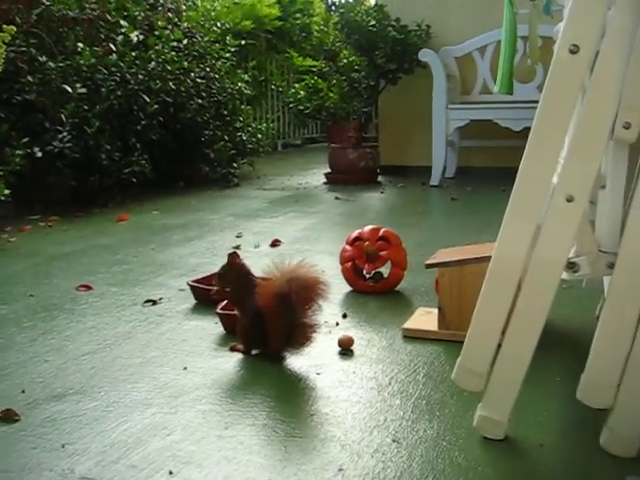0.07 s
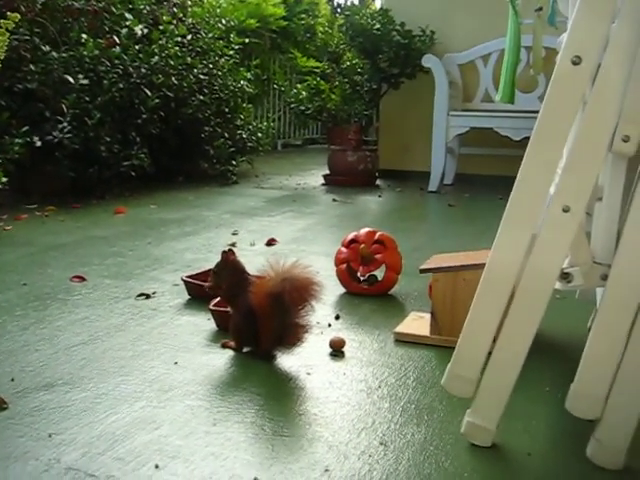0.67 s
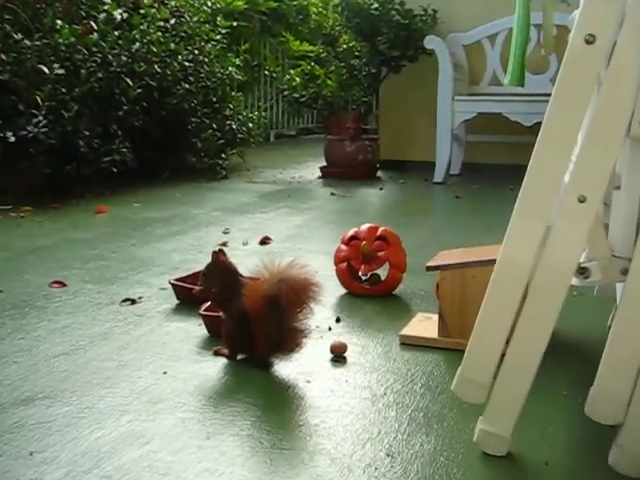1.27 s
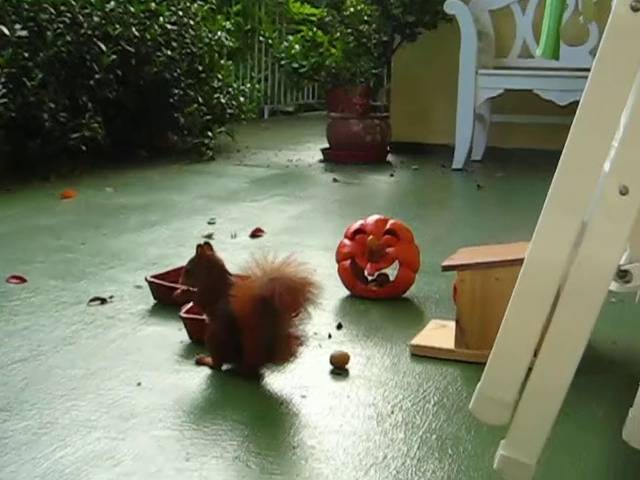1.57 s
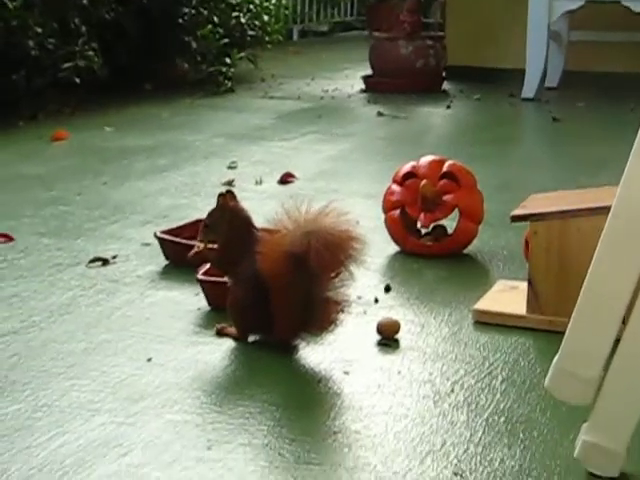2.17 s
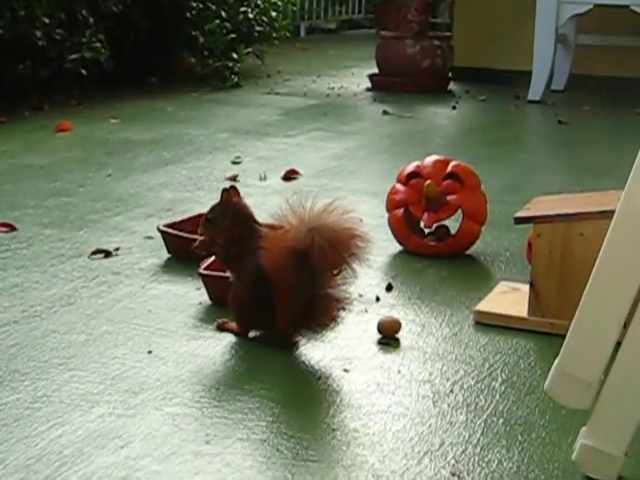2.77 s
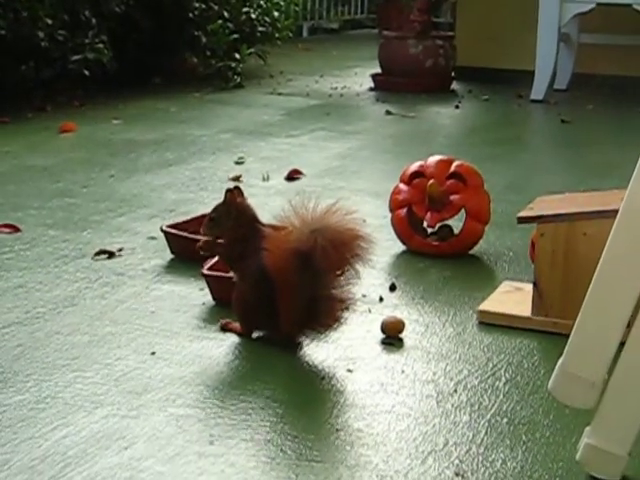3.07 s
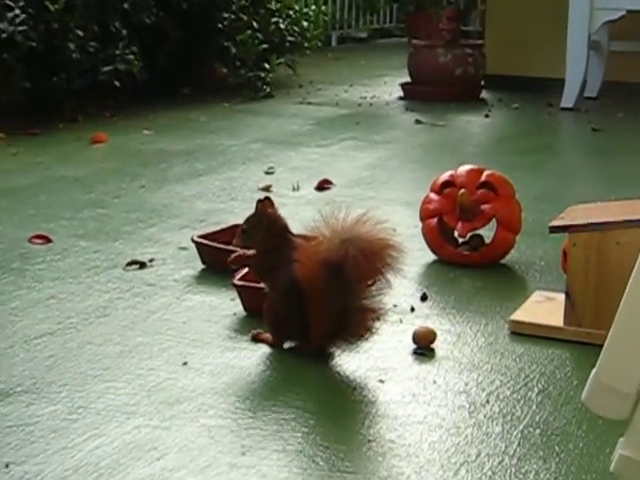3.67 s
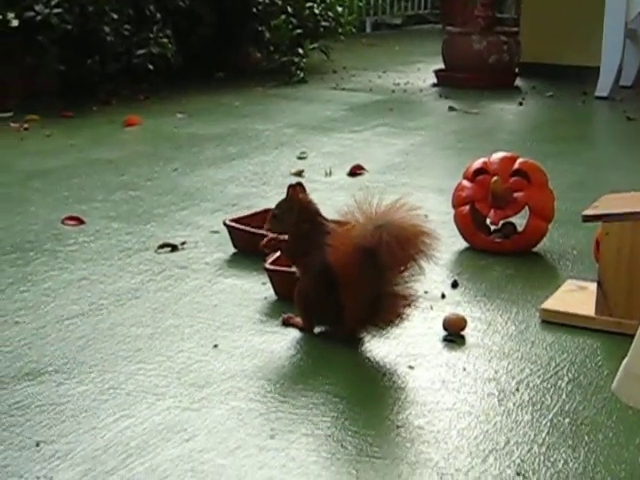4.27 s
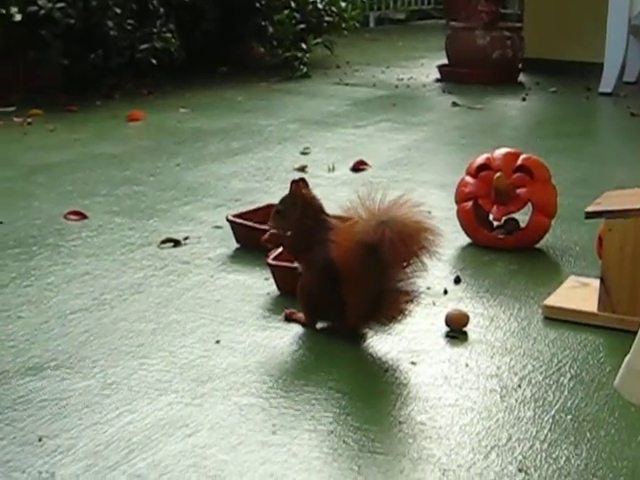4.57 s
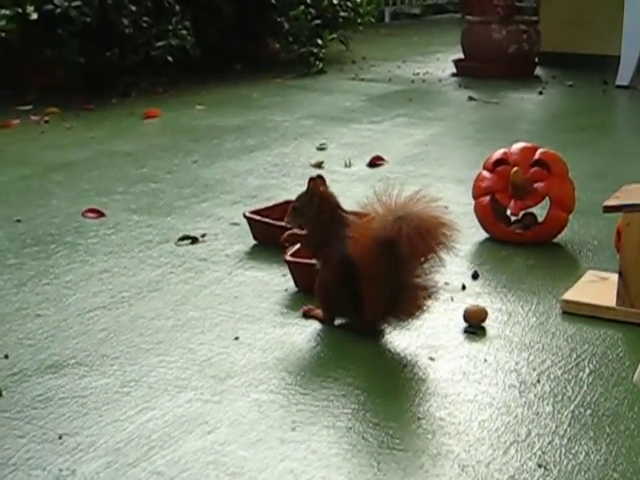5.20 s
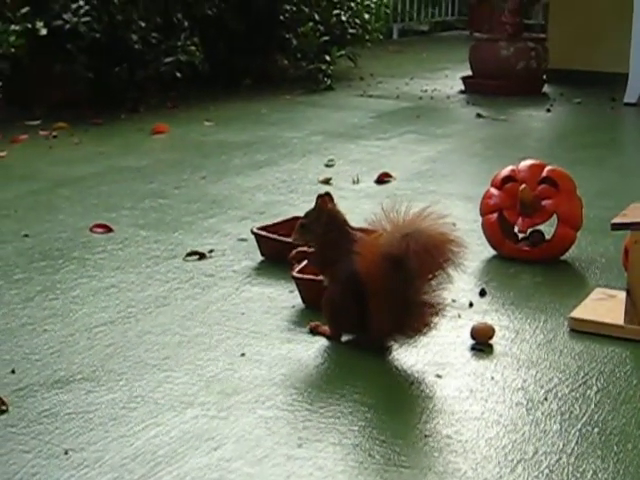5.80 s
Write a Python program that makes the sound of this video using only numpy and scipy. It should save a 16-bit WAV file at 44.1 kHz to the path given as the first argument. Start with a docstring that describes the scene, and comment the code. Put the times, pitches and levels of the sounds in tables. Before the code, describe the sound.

On a quiet covered terrace, faint outdoor air lies under the steady hiss and thin, high whine of a hand-held camera's mono microphone. The zoom motor whirs softly, briefly at first and then for about a second, among light taps and rustles. The zoom lever rattles and snaps back with a sharp plastic click. A few small ticks, rustles and a soft dull knock follow, then one last faint rustle.

```python
"""A quiet covered terrace, heard through the mono microphone of a hand-held camera.
From the start, faint outdoor air lies under preamplifier hiss and a thin electronic whine.
The zoom motor whirs briefly, then again at 1 s, among light taps on its lever and soft rustles.
At about 1.6 s the loose lever rattles and snaps back, ringing the plastic case.
A few small ticks, rustles and a dull knock follow after 3 s, and one last rustle near the end."""
import sys
import numpy as np
from scipy import signal
from scipy.fft import rfft, irfft
from scipy.io import wavfile

SR = 44100
rng = np.random.default_rng(int(sys.argv[2]) if len(sys.argv) > 2 else 0)


def put_to_file(sound):
    """Save the sound as 16-bit audio at rate SR, in the file named by the first command-line argument."""
    columns = np.atleast_2d(sound).T  # one column per channel
    safe = np.clip(columns, -1, 1)
    whole_steps = np.round(safe * 32767)
    wavfile.write(sys.argv[1], SR, whole_steps.astype(np.int16))


N = 257544
T = np.arange(N) / SR


def gain(db):
    """Turns decibels into a number to multiply by."""
    return 10 ** (np.asarray(db) / 20)


def normalise(sound):
    """Scales a sound so that its average level (rms) is 1."""
    return sound / np.sqrt(np.mean(sound ** 2) + 1e-20)


def colour(noise, spectrum):
    """Shapes noise along a curve of (Hz, dB) points, then brings its average level to 1."""
    hz, db = np.transpose(spectrum)
    bins_hz = np.fft.rfftfreq(N, 1 / SR)
    curve_db = np.interp(np.log(bins_hz + 1), np.log(hz), db, right=-60)
    return normalise(irfft(rfft(noise) * gain(curve_db), N))


# The tone of the steady air and hiss. Each row: frequency in Hz, relative level in dB.
AIR_SPECTRUM = [(20, -11), (45, -8), (95, -3.5), (150, -2), (300, -2), (560, -0.6), (1050, -1.1),
                (1400, -3.5), (2400, -7), (4000, -8), (4900, -10), (6100, -10), (7000, -12.5), (9100, -38)]
# The highest part of the preamplifier's hiss. Each row: frequency in Hz, relative level in dB.
FIZZ_SPECTRUM = [(6500, -47), (7200, 0), (8300, -0.4), (11200, -0.5), (12400, -6), (14300, -.3), (15200, 0),
                 (15700, -9), (16100, -30)]


def hiss(air_db=-53, fizz_db=-61):
    """Distant outdoor air blends with the even noise of the microphone's preamplifier."""
    air, fizz = rng.standard_normal((2, N))
    return gain(air_db) * colour(air, AIR_SPECTRUM) + gain(fizz_db) * colour(fizz, FIZZ_SPECTRUM)


# The tones of the camera's electronic clocks. Each row: pitch in Hz, average level in dB.
CLOCK_TONES = [(7568.6, -67.5), (7867, -79), (11518, -83.5), (15137.2, -67.2)]


def whine(frames_per_s=30):
    """The clocks leak thin tones that restart with every picture frame, which adds a faint buzz."""
    frame_time = T % (1 / frames_per_s)
    return np.sqrt(2) * sum(gain(db) * np.sin(2 * np.pi * hz * frame_time) for hz, db in CLOCK_TONES)


# The tone of the zoom motor. Each row: frequency in Hz, relative level in dB.
MOTOR_SPECTRUM = [(500, -0.5), (1500, -3.5), (3600, -7), (5000, -9), (6400, -6), (8500, -16), (12000, -13),
                  (13700, -9), (15500, -12), (16200, -30)]
# The runs of the motor. Each row: start in seconds, seconds until it runs down, average level in dB.
MOTOR_RUNS = [(-.04, .15, -60), (.98, 0.89, -59.5)]


def zoom_motor(spurts_per_s=33, depth=0.65, spin_up_s=0.053, fade_db_per_s=31):
    """The lens motor spins up, whirs in quick small spurts and runs down."""
    spurts = 1 + depth * np.sin(2 * np.pi * (spurts_per_s * T + rng.random()))
    whir = colour(spurts * rng.standard_normal(N), MOTOR_SPECTRUM)
    level = np.zeros(N)
    for start, run_s, db in MOTOR_RUNS:
        age = T - start
        spin_up = np.clip(age / spin_up_s, 0, 1)
        level += spin_up * gain(db - fade_db_per_s * np.maximum(age - run_s, 0))
    return level * whir


def plastic_ring(tones, lag_cycles, rise_cycles, longest_lag_s=0.0022):
    """Struck plastic rings. Low tones cross it more slowly as it bends, so they arrive later."""
    t, out = T[:SR // 10], 0
    for k, (hz, db, fade_s) in enumerate(tones):
        age = np.maximum(t - min(lag_cycles / hz, longest_lag_s), 0)
        swell = 1 - np.exp(-(age * hz / rise_cycles) ** 2)
        fade = gain(db - 60 * age / fade_s)
        out += (-1) ** k * swell * fade * np.sin(2 * np.pi * hz * age)
    return out


def strike(ring, hits):
    """Plays the ring at every hit, softening what lies outside that hit's range of pitches."""
    out = np.zeros(N)
    for start, db, low_hz, high_hz in hits:
        cut_lows = signal.butter(2, low_hz, "highpass", fs=SR, output="sos")
        cut_highs = signal.butter(2, high_hz, fs=SR, output="sos")
        hit = gain(db) * signal.sosfilt(np.vstack([cut_lows, cut_highs]), ring)
        slot = out[round(start * SR):][:len(hit)]
        slot += hit[:len(slot)]
    return out


# The zoom lever's own tones. Each row: pitch in Hz, relative level in dB, seconds to fade by 60 dB.
LEVER_TONES = [(612, -29, .004), (790, -41, .03), (1074, -33, 0.055), (1250, -19, 0.0081),
               (1550, -36, .036), (2000, -26.5, 0.012), (2433, -44, 0.043), (2820, -22, 0.0039),
               (3510, -26, 0.0088), (3710, -27.5, 0.015), (5164, -30, .0036), (6600, -41, .01)]


def lever(touches, width_octaves=1.76):
    """A light touch rings the lever alone, mostly around one middle pitch."""
    spread = 2 ** (width_octaves / 2)
    hits = [(start, db, hz / spread, hz * spread) for start, db, hz in touches]
    return strike(plastic_ring(LEVER_TONES, lag_cycles=0.11, rise_cycles=0.17), hits)


# Taps on the lever. Each row: start in seconds, strength in dB, middle pitch in Hz.
LEVER_TAPS = [(0.088, -17.5, 2300), (.4635, -11.5, 6500), (1.3063, -13.5, 2100), (1.531, -14, 4700),
              (1.541, -17, 1100), (1.5492, 2, 1710), (3.249, -9, 6300), (3.531, -15, 4900)]


def taps():
    """Single taps make the lever tick; each tap has its own middle pitch, some dull, some bright."""
    return lever(LEVER_TAPS)


# The tone of the rubbing. Each row: frequency in Hz, relative level in dB.
RUB_SPECTRUM = [(800, -27), (2600, 0), (3400, 9), (4300, 4), (5400, 2), (6500, 3.5), (8500, -14),
                (15000, -20)]
# Soft rubs. Each row: middle in seconds, seconds to fade by about 17 dB on either side,
# level at the middle in dB, ringing pitch in Hz.
RUBS = [(0.54, .02, -59, 3400), (.589, .024, -55.5, 3450), (1.088, .1, -58, 3650),
        (1.287, .043, -57.5, 3300), (1.613, 0.12, -53.5, 3500), (3.28, 0.02, -52, 3480),
        (3.571, 0.03, -52, 4300), (5.576, 0.05, -54, 3940)]


def rustles(slips_per_s=1800, smoothness=1.6, ring_width_hz=450, ringing=0.37):
    """Each rub is many tiny slips that swell and fade, with a faint ring of its own."""
    slips = normalise(rng.standard_normal(N) * (rng.random(N) < slips_per_s / SR))
    friction = colour(slips + smoothness * rng.standard_normal(N), RUB_SPECTRUM)
    out = np.zeros(N)
    for middle, fade_s, db, hz in RUBS:
        ring = normalise(signal.lfilter(*signal.iirpeak(hz, hz / ring_width_hz, SR), friction))
        stroke = np.exp(-2 * ((T - middle) / fade_s) ** 2)
        out += gain(db) * stroke * normalise(friction + ringing * ring)
    return out


def rattle(start=1.597, gap_s=0.032, bumps=5, first_db=-13, fade_db_per_s=50, middle_hz=1300):
    """The loose lever rattles while the motor runs, each bump weaker than the last."""
    ages = gap_s * np.arange(bumps)
    return lever([(start + age, first_db - fade_db_per_s * age, middle_hz) for age in ages])


def crack(db=-33, peak_s=0.0006, low_hz=5000):
    """Plastic meets plastic in a tiny burst of bright noise, which starts a knock."""
    rise = T[:SR // 10] / peak_s
    cut_lows = signal.butter(2, low_hz, "highpass", fs=SR, output="sos")
    grit = signal.sosfilt(cut_lows, rng.standard_normal(len(rise)))
    return gain(db) * rise * np.exp(1 - rise) * grit


# The camera case's own tones. Each row: pitch in Hz, relative level in dB, seconds to fade by 60 dB.
CASE_TONES = [(542, -21.5, .036), (832, -13, 0.025), (1017, -16, 0.037), (1170, -22.5, 0.041),
              (1496, -16.5, 0.012), (1940, -28.5, 0.033), (2346, -12.5, 0.0056), (3244, 2.05, 0.0044),
              (3280, -19, 0.018), (3690, -6, 0.0074), (4400, -18, 0.0096), (4860, -30, 0.023),
              (5440, -10, 0.0039), (7120, -30, 0.013), (7940, -16, 0.0067), (8716, -40, 0.028),
              (9500, -30, 0.012), (10700, -28, 0.0052), (14471, -39, .003), (15439, -48, .011)]
# Knocks on the case. Each row: start in seconds, strength in dB, lowest and highest pitch in Hz.
# A harder contact reaches higher.
CASE_KNOCKS = [(1.6526, -1.5, 327, 17500), (3.3389, -24, 350, 1600)]


def knocks():
    """The lever snaps back on its stop and rings the whole case; a soft, dull knock comes later."""
    ring = plastic_ring(CASE_TONES, lag_cycles=1.77, rise_cycles=0.87)
    return strike(ring + crack(), CASE_KNOCKS)


def scene():
    """One microphone hears everything and feeds both channels."""
    mono = hiss() + whine() + zoom_motor() + taps() + rustles() + rattle() + knocks()
    return np.array([mono, mono])


def record(dry):
    """The camera cuts off the very highest treble, above 16200 Hz."""
    cut_highs = signal.firwin(511, 16200, window=("kaiser", 9), fs=SR)
    return signal.oaconvolve(dry, cut_highs[None], "same")


dry = scene()
out = record(dry)
put_to_file(out)
```